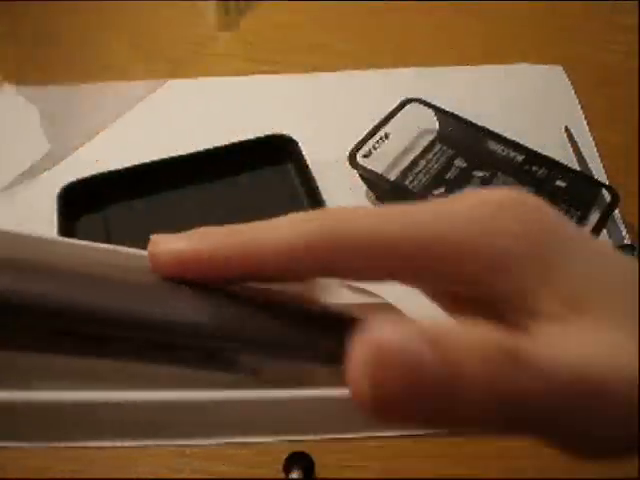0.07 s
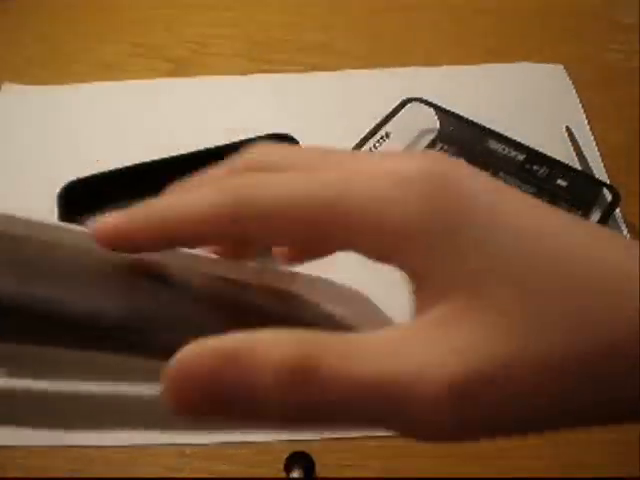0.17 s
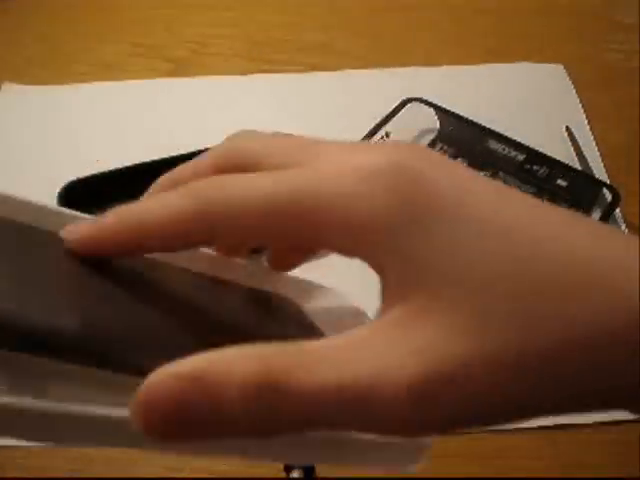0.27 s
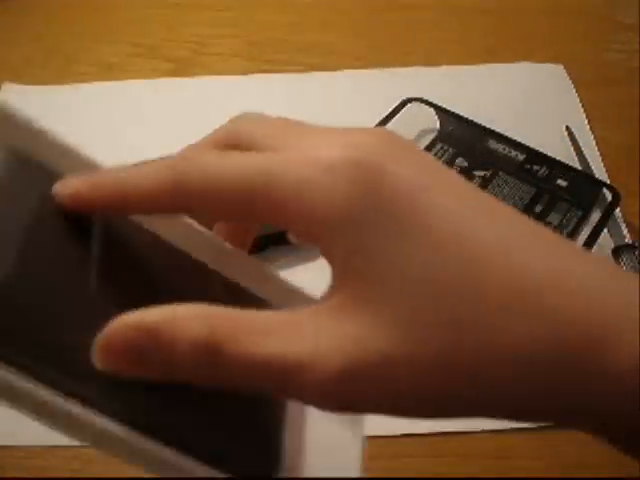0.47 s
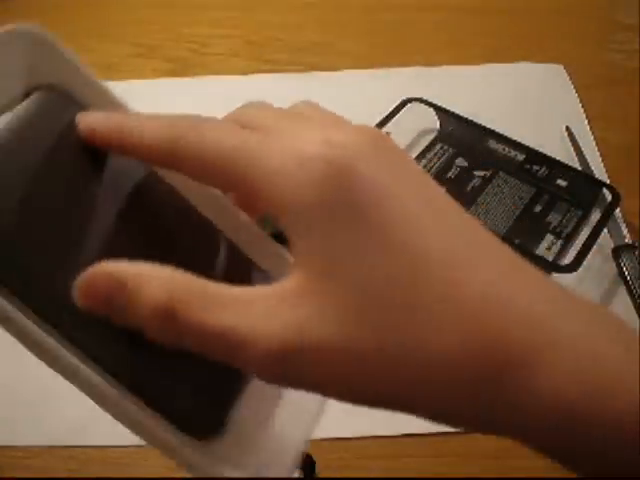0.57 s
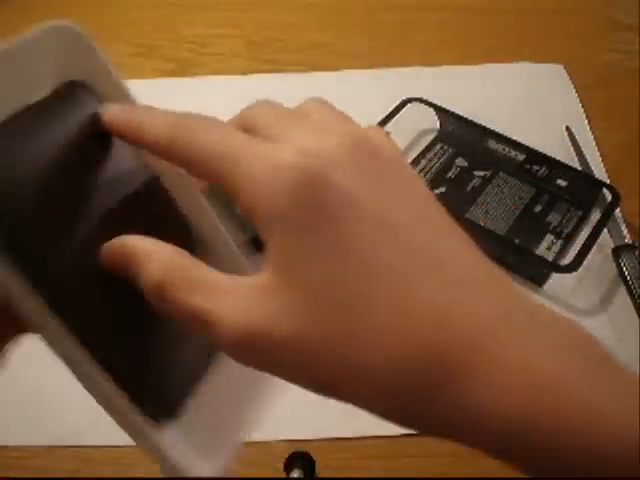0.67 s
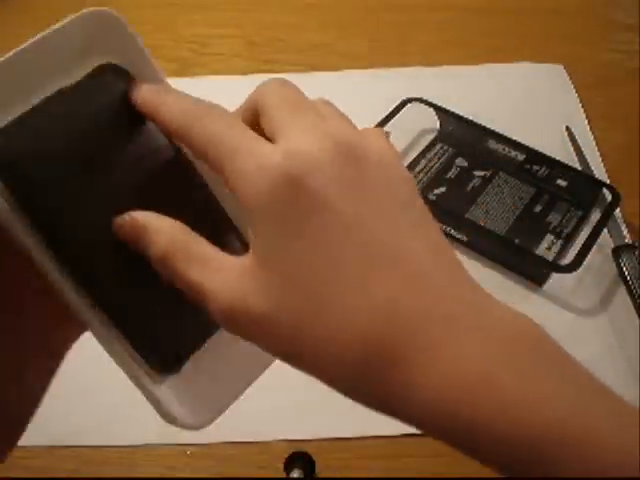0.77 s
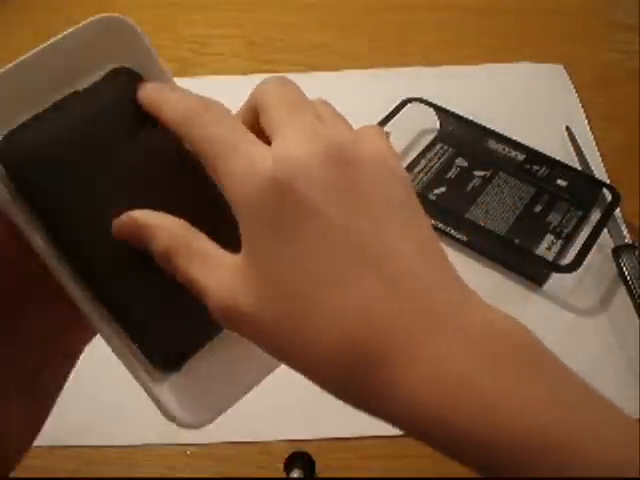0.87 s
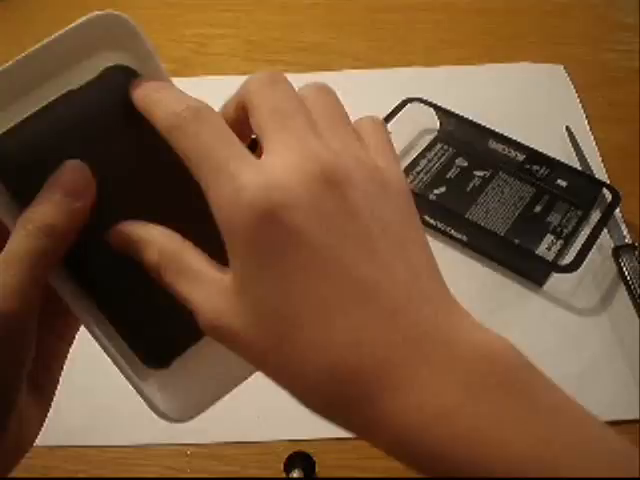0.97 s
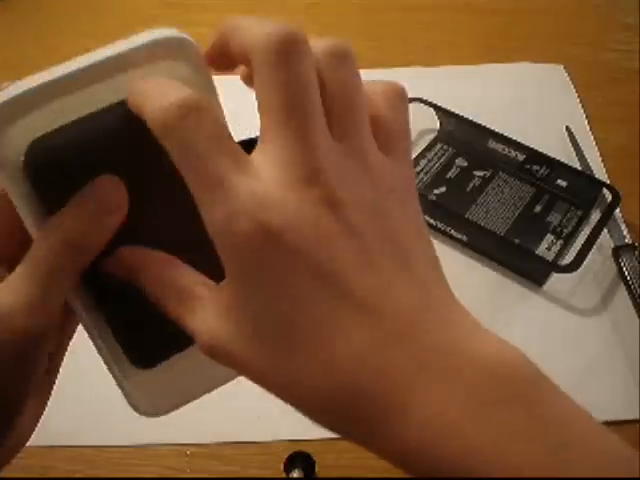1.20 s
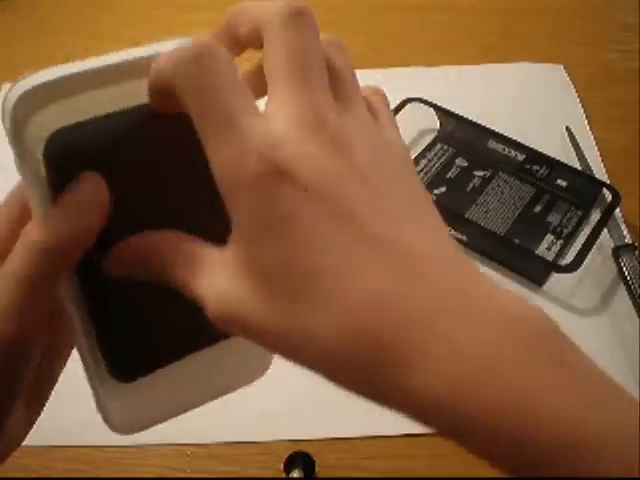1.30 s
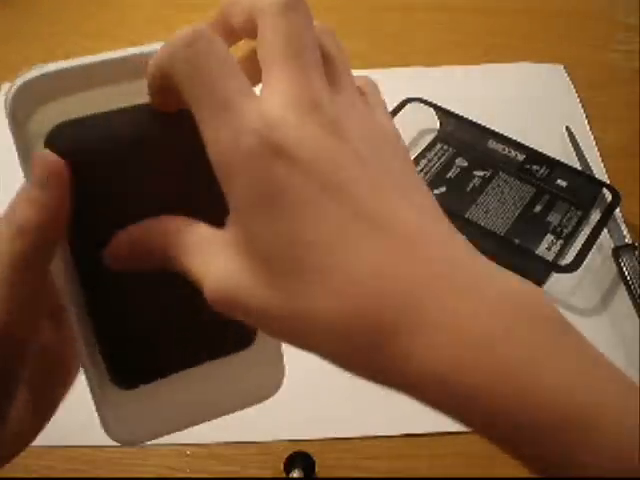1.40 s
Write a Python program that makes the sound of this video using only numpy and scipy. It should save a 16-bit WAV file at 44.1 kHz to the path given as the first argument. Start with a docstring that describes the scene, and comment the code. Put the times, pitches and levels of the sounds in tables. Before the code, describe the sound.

Thin hard plastic packaging clicks, pops and crunches in irregular bursts while being flexed by hand

```python
"""A hand bends a stiff plastic tray close to a small camera in a quiet room.
Dents in the thin walls snap over in short volleys of clicks; these and denser scrunches excite the tray's
modes, as does the crackle of bending. Decaying sines make the finger thumps, filtered noise the room's air.
The camera stores 8000 coarse 8-bit samples a second and plays each as a flat step,
which mirrors the sound into the treble."""
import sys
import numpy as np
from scipy import signal
from scipy.io import wavfile

SR = 44100
rng = np.random.default_rng(int(sys.argv[2]) if len(sys.argv) > 2 else 0)


def convert_level_to_amplitude(level_db):
    """Map a level in decibels to its linear amplitude factor."""
    exponent = np.asarray(level_db, float) / 20
    return 10 ** exponent


def store_wav(level_fs):
    """Save 16-bit WAV to argv[1]."""
    pcm = np.round(np.clip(np.atleast_2d(level_fs), -1, 1) * 32767)
    wavfile.write(sys.argv[1], SR, pcm.T.astype(np.int16))


N = 63945  # length [samples]
COLOUR_SCATTER_DB = 2.5  # how unevenly one click is shared among the modes


def ring(drive, hz, t60):
    """Modal resonance: a one-pole complex filter turns a unit click into a decaying sine of initial height 1."""
    pole = np.exp(2j * np.pi * hz / SR - np.log(1000) / (t60 * SR))
    return signal.lfilter([1], [1, -pole], drive).imag


def register_gain(hz, middle_db, bass_db, treble_db):
    """Spectral weighting: each mode is driven by the level of the register its frequency lies in."""
    bass_hz, treble_hz = 900, 2400
    upper_db = np.where(hz > treble_hz, treble_db, middle_db)
    return convert_level_to_amplitude(np.where(hz < bass_hz, bass_db, upper_db))


def add_clicks(drive, times, sizes, gains):
    """Modal excitation: each impulse is added to the drive of every mode, in randomly uneven shares."""
    at = np.clip((times * SR).astype(int), 0, N - 1)
    shares = convert_level_to_amplitude(COLOUR_SCATTER_DB * rng.standard_normal((len(gains), len(at))))
    for row, gain, share in zip(drive, gains, shares):
        np.add.at(row, at, gain * share * sizes)


def air():
    """Stationary band-limited noise: the faint, dull sound of the room."""
    low_hz, high_hz, level_db = 194, 540, -55.5
    band = signal.butter(1, [low_hz, high_hz], "band", fs=SR)
    noise = signal.lfilter(*band, rng.standard_normal(N))
    return noise / noise.std() * convert_level_to_amplitude(level_db)


def crackle(hz):
    """Impulsive noise: dense tiny clicks of very uneven size; returns the mode drives and the level in dB."""
    # strength and colour of the crackle as the tray is bent:
    # (time [s], relative level [dB], brightness [dB per octave about 1500 Hz])
    bending = np.array([(0, -61, 6), (.115, -44.5, -6.5), (0.123, -47.5, 13), (.19, -36.5, -1.5),
                        (.3, -34.5, 6), (.4, -46, 11), (0.531, -48, -17), (.64, -63, 10.5),
                        (0.699, -36, 21), (0.781, -43.5, -15), (.82, -40.5, 5), (0.839, -29, 9.5),
                        (0.999, -34.5, 12.5), (1.009, -39.5, 18.5), (1.08, -44, -2), (1.17, -47.5, -2),
                        (1.281, -44.5, 8.5), (1.45, -45, 10)]).T
    clicks_per_s, mean_scatter_db = 1600, 4.1
    hit = rng.random(N) < clicks_per_s / SR
    sign = np.sign(rng.standard_normal(N))
    clicks = hit * sign * convert_level_to_amplitude(mean_scatter_db * rng.exponential(size=N))
    t = np.arange(N) / SR
    level_db, brightness = (np.interp(t, bending[0], column) for column in bending[1:])
    tilt_db = np.log2(hz / 1500)[:, None] * brightness
    colour_db = COLOUR_SCATTER_DB * rng.standard_normal((len(hz), N))
    return clicks * convert_level_to_amplitude(colour_db + tilt_db), level_db


def snaps(hz):
    """Snap-through buckling: one inward click, then smaller ones that die away; modes near its pitch ring most."""
    # dents snapping over: (time [s], middle drive [dB], bass drive [dB], treble drive [dB],
    # a third of the volley's length [s], favoured pitch [Hz])
    dents = [(.1216, -27, -36, -25, 0.0042, 3750), (0.1293, -45, -37, -28, 0.0029, 3800),
             (.1645, -40, -46, -37.5, 0.002, 3680), (.190, -23, -36.5, -16.5, 0.008, 3260),
             (0.249, -8, -9.5, -12, 0.00093, 1600), (.2582, -12, -17, -25, 0.0034, 1600),
             (0.271, -28, -23, -25, .004, 3270), (0.2871, -15.5, -45, -29.5, 0.0011, 3560),
             (.4256, -13.5, -18, -21.5, 0.0059, 1570), (0.491, -32, -37, -17.5, 0.0042, 3606),
             (0.5402, -28, -33, -29, 0.0038, 2500), (.552, -21.5, -46, -14, 0.0043, 3640),
             (0.5718, -8, -16, -6, .007, 1520), (0.5975, -15, -27.5, -20.5, .005, 3700),
             (0.6451, -24.5, -32, -12.5, 0.0029, 3630), (0.656, -5.5, -11.5, -2.5, 0.0023, 3740),
             (0.697, -11.5, -1, -5.5, 0.0021, 3270), (.714, -12, -31, -24.5, 0.0027, 3270),
             (0.737, -28, -30, -19.5, 0.0045, 3270), (0.7482, -2.5, -20.5, -13.5, .0015, 1880),
             (.763, -6.5, -14, -13, 0.0032, 1410), (.833, -14.5, -30, -21.5, .003, 1150),
             (0.8491, -21.5, -32, -22.5, 0.0033, 1880), (0.883, -6, -19.5, -2, .003, 1860),
             (0.9076, -1.5, -18, -15.5, .002, 1940), (0.9211, -14, -23.5, -13.5, 0.0036, 2150),
             (.948, -19.5, -15, -24.5, .003, 1880), (1.0341, -11, -15, -17.5, 0.0023, 1220),
             (1.1157, -10, -17, -20.5, 0.0019, 1710), (1.2088, -17.5, -32, -19, 0.0024, 1196),
             (1.2153, -20, -59, -20.5, 0.0031, 3120), (1.2858, -4, -17, -22.5, 0.0016, 1600),
             (1.2945, -21, -32.5, -45, .002, 1900), (1.3452, -38, -37, -46, 0.0045, 1480),
             (1.396, -23.5, -20, -22.5, 0.0048, 1158), (1.4396, -23, -32.5, -32, .001, 1508)]
    volley_db, volley_scatter_db, volley_per_s = -4, 5, 1300
    focus_db, focus_octaves = 6.5, .2
    drive, slots = np.zeros((len(hz), N)), 32  # slots: most after-clicks in one volley
    for t, middle_db, bass_db, treble_db, third_s, pitch_hz in dents:
        place, chance = rng.random((2, slots))
        sign, scatter = rng.standard_normal((2, slots))
        long_s = 3 * max(third_s, .0005)
        hit = chance < long_s * volley_per_s / slots
        after = hit * np.sign(sign) * convert_level_to_amplitude(volley_db + volley_scatter_db * scatter) * np.exp(-2 * place)
        # scaled so that the volley has the energy of one unit click
        sizes = np.r_[-1, after] / np.sqrt(1 + np.sum(after ** 2))
        octaves_off = np.log2(hz / pitch_hz)
        focus = convert_level_to_amplitude(focus_db * np.exp(-(octaves_off / focus_octaves) ** 2))
        gains = focus * register_gain(hz, middle_db, bass_db, treble_db)
        add_clicks(drive, t + np.r_[0, place * long_s], sizes, gains)
    return drive


def thumps():
    """Damped oscillation: each low note is a sine that swells briefly and decays exponentially."""
    # low thumps and hollow knocks of the fingers on the tray:
    # (start [s], level before swell and decay [dB], frequency [Hz], t60 [s], attack time constant [s])
    knocks = [(.208, -50, 152, 0.028, .004), (.56, -46, 35.2, 0.11, .02), (.6545, -33, 130, .02, .001),
              (.715, -40, 110, 0.26, .04), (.122, -42, 520, .04, .002), (.605, -38, 610, .04, .004),
              (.764, -17, 436, 0.076, .004), (.763, -21, 617, 0.055, .003), (.87, -32, 264, .04, .003),
              (.905, -39, 90, .04, .003), (1.394, -44.5, 375, .05, .002)]
    out = np.zeros(N)
    for start, db, hz, t60, attack_s in knocks:
        t = np.maximum(np.arange(N) / SR - start, 0)
        swell = 1 - np.exp(-t / attack_s)
        out -= convert_level_to_amplitude(db - 60 * t / t60) * swell * np.sin(2 * np.pi * hz * t)
    return out


def scrunches(hz):
    """Random impulse train: clicks at random moments under an envelope that rises fast and fades slowly."""
    # dense runs of clicks: (start [s], length [s], middle drive [dB], bass drive [dB], treble drive [dB])
    runs = [(0.138, 0.056, -54, -42, -37.5), (0.2, .012, -27.5, -37, -27.5), (.206, .018, -20.5, -39, -14),
            (0.23, 0.019, -24, -32.5, -25), (0.254, 0.047, -29, -31.5, -37.5),
            (0.43, 0.014, -22.5, -37.5, -30.5), (0.446, 0.017, -37.5, -41, -37),
            (0.572, 0.039, -22.5, -27, -37), (0.658, 0.032, -22, -35, -22),
            (.722, 0.029, -37.5, -31.5, -24.5), (0.755, 0.022, -26, -17.5, -27),
            (0.884, 0.021, -28, -50, -24), (0.927, 0.045, -32.5, -54, -43.5),
            (1.014, 0.021, -23, -47, -25.5), (1.031, 0.023, -18, -37, -17.5), (1.088, .024, -25, -58, -30),
            (1.111, 0.014, -25, -35, -30.5), (1.284, 0.017, -24, -39.5, -39.5)]
    clicks_per_s = 2300
    drive, slots = np.zeros((len(hz), N)), 200  # slots: most clicks in one run
    for t, long_s, middle_db, bass_db, treble_db in runs:
        place, chance = rng.random((2, slots))
        hit = chance < long_s * clicks_per_s / slots
        sign = np.sign(rng.standard_normal(slots))
        envelope = np.sin(np.pi * place ** 0.59) ** .5
        gains = register_gain(hz, middle_db, bass_db, treble_db)
        add_clicks(drive, t + place * long_s, hit * sign * envelope, gains)
    return drive


def tray():
    """Modal superposition: snaps, scrunches and crackle all ring the same set of modes."""
    # tray modes: (frequency [Hz], relative level [dB], t60 [s])
    tray_modes = [(315, -7, 0.01), (436, -8, 0.022), (642.5, -2.5, 0.077), (778, -10.5, .02),
                  (995, -13, 0.042), (1212, -5.5, .02), (1480, 1, 0.014), (1678, 1, 0.031),
                  (1880, 7, 0.015), (2150, 3.5, 0.0074), (2500, 9.5, 0.0089), (2819, 7, 0.0093),
                  (3270, 10.5, 0.011), (3634, 5, .012), (3860, -3, .01)]
    # the bare click of the wall, very short: (frequency [Hz], relative level [dB], t60 [s])
    wall_modes = [(510, -6.5, 0.004), (1600, 4, 0.0074), (3200, 9.5, 0.0037)]
    click_db, crackle_db = -17, 1
    modes = np.array(tray_modes + wall_modes)
    hz = modes[:, 0]

    def body(drive):
        """Linear summation: the ringing of all modes, each at its own level."""
        return sum(convert_level_to_amplitude(db) * ring(row, f, t60) for row, (f, db, t60) in zip(drive, modes))

    crackle_drive, bending_db = crackle(hz)
    fizz = body(crackle_drive)
    fizz = fizz / fizz.std() * convert_level_to_amplitude(bending_db + crackle_db)
    return convert_level_to_amplitude(click_db) * body(snaps(hz) + scrunches(hz)) + fizz


def room(x):
    """Diffuse reverberation: convolution with decaying noise that starts after the first wall's delay."""
    t60_s, level_db, gap_s = 0.43, -10.5, .006
    t = np.arange(SR // 2) / SR
    tail = rng.standard_normal(len(t)) * np.exp(-np.log(1000) * t / t60_s) * (t > gap_s)
    tail /= np.sqrt(np.sum(tail ** 2))
    return x + convert_level_to_amplitude(level_db) * signal.fftconvolve(x, tail)[:N]


def scene():
    """Superposition: the tray in its room through the microphone's band, plus unfiltered thumps and air."""
    low_hz, top_hz = 324, 4420
    mic = signal.butter(3, [low_hz, top_hz], "band", fs=SR, output="sos")
    heard = signal.sosfilt(mic, room(tray()))
    return (heard + thumps() + air())[None]


def top_cut(x):
    """Nothing passes above the cut-off."""
    return signal.sosfilt(signal.butter(12, 17000, fs=SR, output="sos"), x)


def record(dry):
    """Zero-order hold: slow sampling, 8-bit rounding and flat steps leave mirror images in the treble."""
    rate_hz, steps, offset = 8000, 128, -.0039  # steps on each side of zero; offset in full scale
    shelf_hz, end_hz = 15750, 16600
    slot = np.floor(np.arange(N) * rate_hz / SR)
    taken = np.interp(slot * SR / rate_hz, np.arange(N), dry[0]) + offset
    held = np.clip(np.round(taken * steps), -steps, steps - 1) / steps
    # the top is lowered above the first edge and cut above the second
    shelf = signal.ellip(6, .1, 12, shelf_hz, fs=SR, output="sos")
    cut = signal.ellip(10, .1, 40, end_hz, fs=SR, output="sos")
    out = signal.sosfiltfilt(np.vstack([shelf, cut]), held)
    finished = np.clip(out, -1, 1)[None]
    return top_cut(finished)


dry = scene()
out = record(dry)
store_wav(out)
```